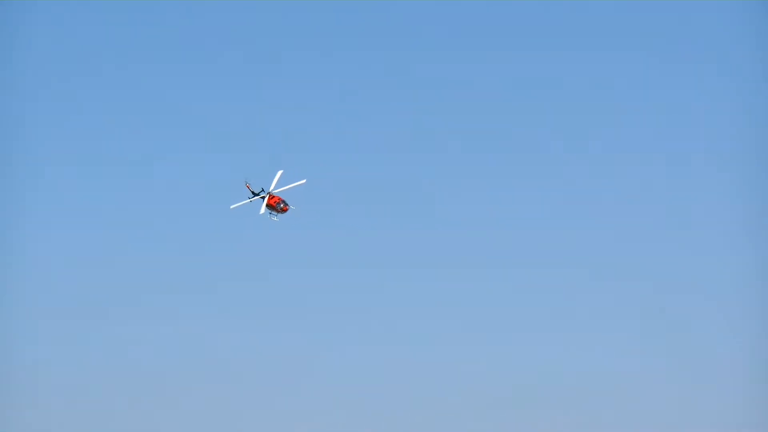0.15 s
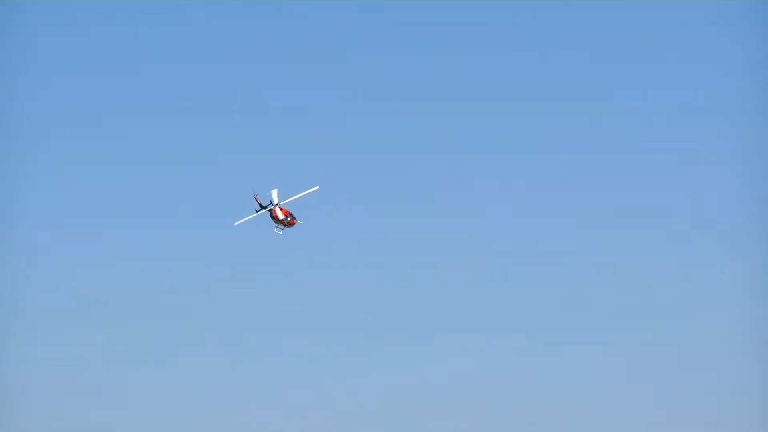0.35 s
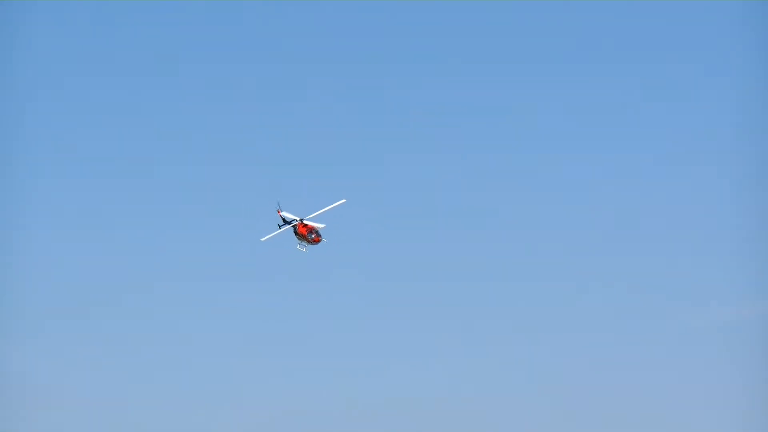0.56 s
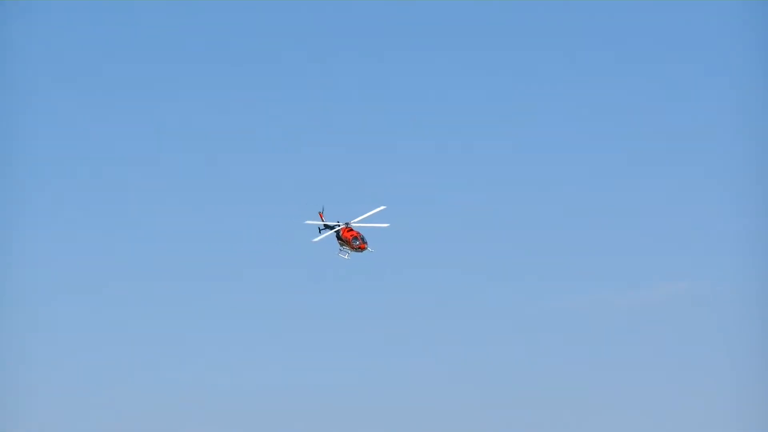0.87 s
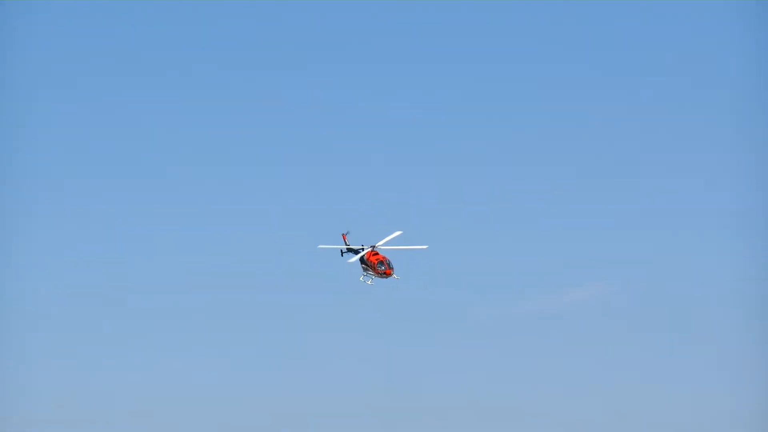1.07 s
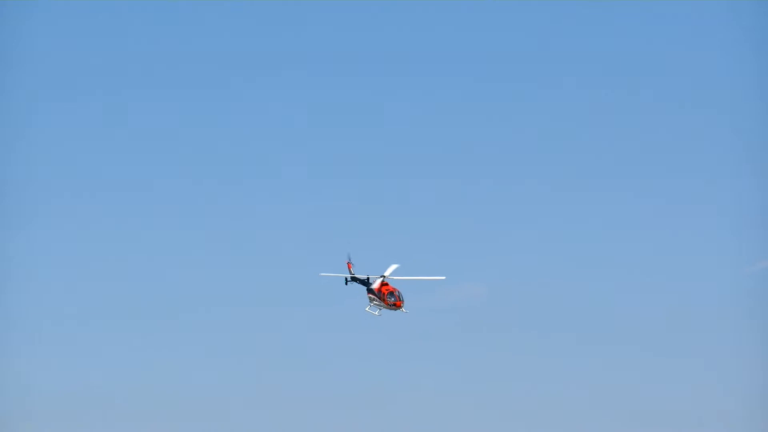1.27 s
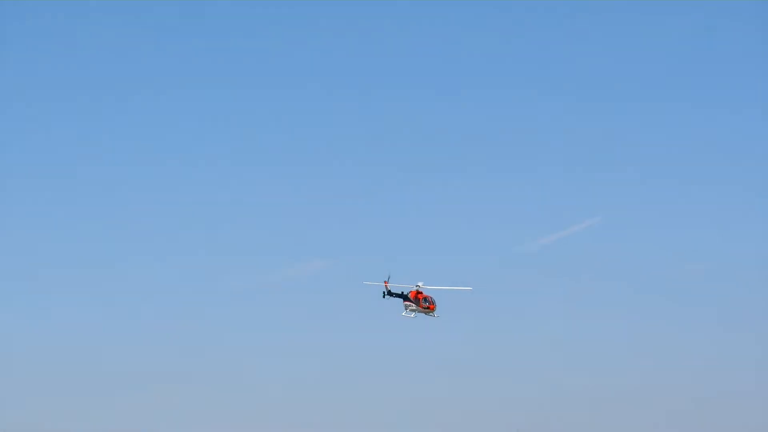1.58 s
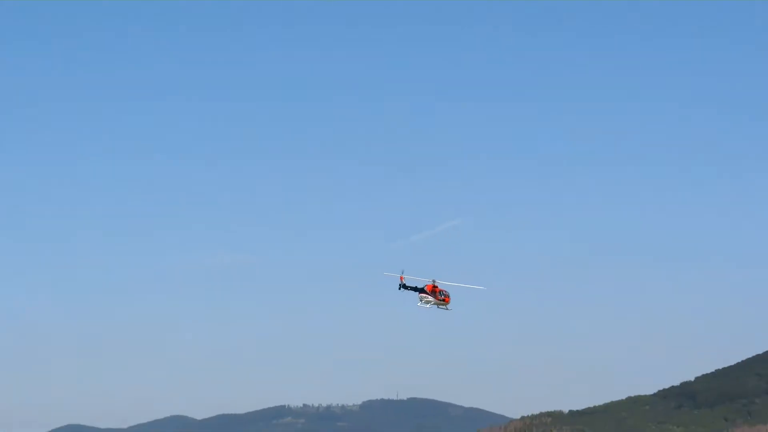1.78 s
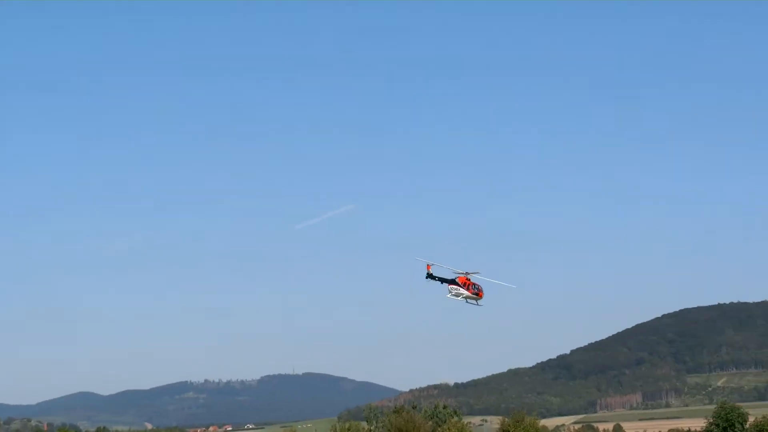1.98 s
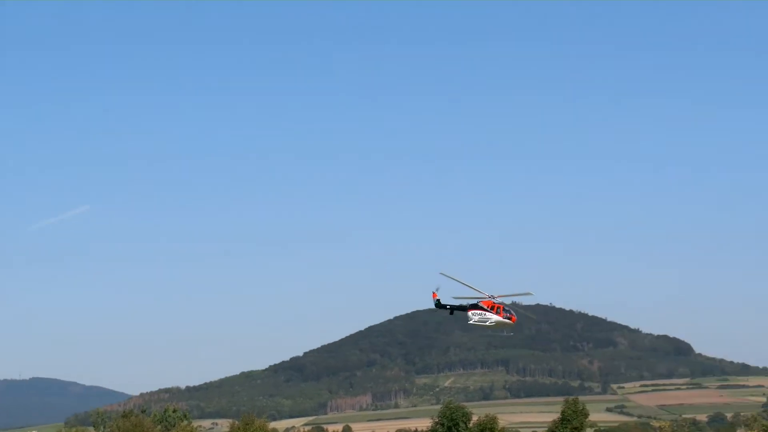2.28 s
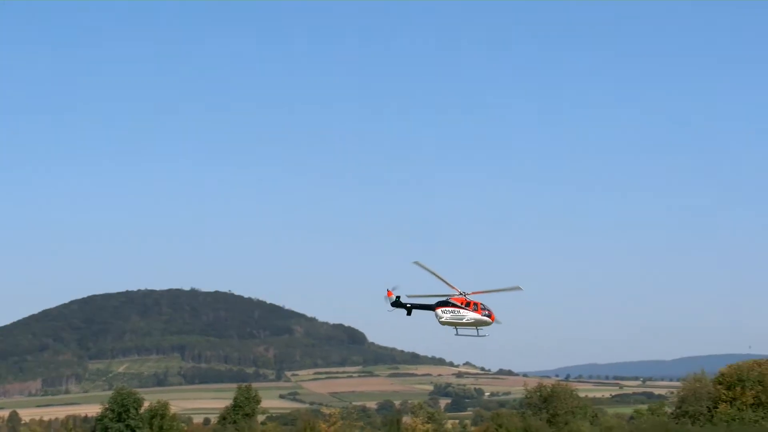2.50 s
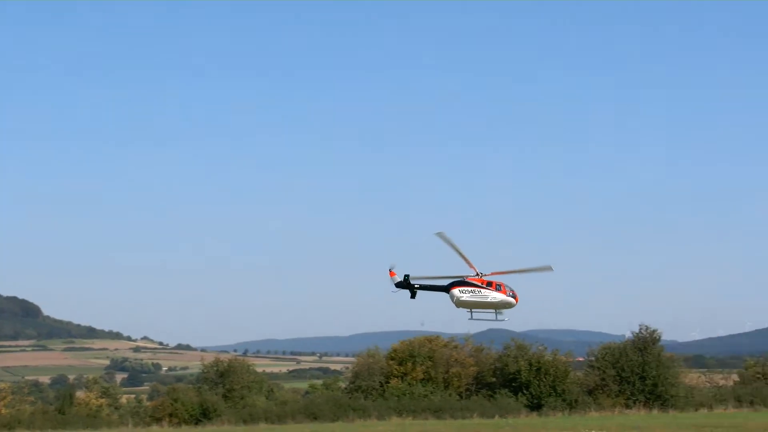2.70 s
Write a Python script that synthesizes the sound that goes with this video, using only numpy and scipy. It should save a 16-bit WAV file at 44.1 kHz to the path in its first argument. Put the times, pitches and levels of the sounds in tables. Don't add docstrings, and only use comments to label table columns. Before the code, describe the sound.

An electric model helicopter whines and chops closer outdoors, its blades hissing, then cracking loudly nearby.

```python
import sys
import numpy as np
from scipy import signal
from scipy.fft import rfft, irfft
from scipy.io import wavfile
from scipy.ndimage import uniform_filter1d, map_coordinates

SR = 44100
rng = np.random.default_rng(int(sys.argv[2]) if len(sys.argv) > 2 else 0)


def gain_from_db(level_db):
    decades = np.asarray(level_db, float) / 20
    return 10 ** decades


def persist_wave(psi):
    counts = np.round(np.clip(psi, -1, 1) * 32767).astype(np.int16)
    wavfile.write(sys.argv[1], SR, np.atleast_2d(counts).T)


N = 125685
GEAR = 7 / 24


def unit(x):
    return x / np.sqrt(np.mean(x ** 2) + 1e-20)


def even_out(noise, window):
    power = uniform_filter1d(np.mean(noise ** 2, axis=0), size=window)
    return noise / np.sqrt(np.abs(power))


def along(points, hz):
    f, v = np.transpose(points)
    return np.interp(np.log(hz + 1), np.log(f + 1), v, left=v[0], right=v[-1])


def curve(rows):
    return np.interp(np.arange(N) / SR, [r[0] for r in rows], [r[-1] for r in rows])


def wobble(rate):
    knots = rng.standard_normal(int(N * 40 / SR) + 4)
    return map_coordinates(knots, [np.arange(N) * min(rate, 40) / SR])


# frequency_hz, likeness (1 = same left and right)
COHERENCE = [(60, 0.77), (180, 0.96), (550, 0.89), (1650, 0.91), (4970, 0.9), (15000, 0.87)]


def shaped(gain_db, patchy_db, size):
    hz, t, z = signal.stft(rng.standard_normal((2, N)), SR, nperseg=size)
    patches = uniform_filter1d(rng.standard_normal(z.shape[1:]), size=8, axis=0)
    patches = uniform_filter1d(patches, size=4, axis=1)
    turn = np.arccos(np.clip(along(COHERENCE, hz), -1, 1))[:, None] / 2
    gain = gain_from_db(gain_db(hz[:, None], t / t[-1]) + patchy_db * unit(patches))
    z = z * gain * [np.cos(turn), np.sin(turn)]
    mid, side = signal.istft(z, nperseg=size)[1][:, :N]
    return np.array([mid + side, mid - side])


def tone(cycles, db, unsteady_db, drift=0.15):
    level = np.sqrt(2) * gain_from_db(db + unsteady_db * wobble(9.07))
    return -level * np.cos(2 * np.pi * (cycles + drift * wobble(6.46)))


# order, level_db, growth (dB per dB nearness), unsteady_db, banking_change_db
TAIL = [(1, -64.5, .55, 1.2, 0), (2, -58, 0, 2.1, 15), (3, -36, 1, .6, 0), (4, -46, .35, 1.2, -2),
        (5, -50.5, .6, 1.5, -1), (6, -63, .7, 2.5, 3), (7, -58, .8, 1.8, -7), (8, -59, -.1, 1.6, 11),
        (9, -62, 1.1, 2, -2), (10, -66, 1.4, 2.2, 1), (11, -70, 1.3, 2, 6), (12, -59, .1, 1.6, 5),
        (14, -66, .5, 2, 0), (15, -63, .5, 2, 0)]


def tail_rotor(turns, near_db):
    bank = np.clip((np.arange(N) / SR - 2.11) / 0.61, 0, 1)
    return sum(tone(order * turns, db + growth * near_db + change * bank, unsteady, drift=order / 100)
               for order, db, growth, unsteady, change in TAIL)


# tail_order, main_blade_passes_added, level_db, growth (dB per dB nearness)
CHOP = [(2, 1, -62, 1.2), (3, 1, -55, 1.4), (4, 1, -56, 1.15), (5, 1, -58, 1.5), (6, 1, -58, 1.75),
        (7, 1, -57.5, 1.75), (8, 1, -63, 1.1), (9, 1, -64, 1.2), (3, 2, -65, 1.6), (6, 2, -62, 1.2),
        (4, 2, -58, .75), (5, 2, -58, .6), (3, .25, -57, 1.05)]


def wake_chop(turns, near_db):
    lag = 0.449
    return sum(tone((order + passes * GEAR) * turns - lag * order, db + growth * near_db, 2.3, drift=0.09)
               for order, passes, db, growth in CHOP)


# start_s, level_db
LOAD = [(0.0, -47), (0.14, -49), (0.2, -56.5), (0.32, -45), (0.42, -50.5), (0.55, -51.5), (0.75, -49.5),
        (0.95, -51.5), (1.15, -49.5), (1.4, -52), (1.6, -45.5), (1.85, -42), (2.0, -41), (2.2, -35),
        (2.33, -34), (2.5, -31), (2.68, -34), (2.85, -29.5)]
# frequency_hz, level_db_per_hz
HISS = [(3000, -15), (5500, -8), (7800, 3), (9200, 1.5), (11000, 2), (12500, 3), (14000, -2), (15000, -15)]
# frequency_hz, sweep_sharpness, then level_db of each of the four blades
SPANS = [
    (7200, 1.1, 0.5, 0.55, -2, -0.5),
    (10050, 1.48, -0.063, -0.62, 1.5, 0.046),
    (13300, 1.7, 0.98, 1.1, -1.5, -0.5),
]
# start_s, lag_blade_passes
SLANT = [(0, .08), (1.2, .04), (1.5, -.15), (2.85, -.17)]


def blade_hiss(passes, size_db):
    def colour(hz, go):
        distance = np.clip((0.55 - go) / 0.15, 0, 1)
        return along(HISS, hz) - 15 * distance * (hz / 14000) ** 4
    spectrum = rfft(even_out(shaped(colour, patchy_db=2, size=256), SR // 5))
    hz, out = np.fft.rfftfreq(N, 1 / SR), 0
    centres_hz = [r[0] for r in SPANS]
    for i, (_, sharp, *blades_db) in enumerate(SPANS):
        part = irfft(spectrum * np.interp(hz, centres_hz, np.arange(3) == i), N)
        heard = passes - (i - 1) * curve(SLANT)
        index = np.round(heard).astype(int)
        draws = rng.standard_normal((400, 2))
        angle = 2 * np.pi * (heard - index + 0.019 * draws[index, 0])
        sweep = unit(np.exp(sharp * (np.cos(angle) - 1) / 2))
        pass_db = size_db + np.resize(blades_db, 400) + 1.3 * draws[:, 1]
        out = out + gain_from_db(uniform_filter1d(pass_db[index], size=90)) * sweep * part
    return gain_from_db(curve(LOAD) - 1) * out


# start_s, peak_db
CRACKS = [(1.3464, -31), (1.5508, -20), (1.7848, -23), (1.9868, -23), (2.019, -19), (2.0492, -21),
          (2.2367, -22), (2.301, -21), (2.3792, -17), (2.586, -17), (2.6044, -15), (2.6508, -18),
          (2.764, -12), (2.7969, -15)]


def blade_slap(blades, near_db):
    draws = rng.standard_normal((400, 2))
    at = np.flatnonzero(np.diff(np.floor(blades)))
    late = (draws[:len(at), 0] * 40).astype(int)
    kicks, cracks = np.zeros(N), np.zeros(N)
    cracks[[round(s * SR) + 20 for s, _ in CRACKS]] = [gain_from_db(db - 4) for _, db in CRACKS]
    kicks[np.clip(at + late, 0, N - 1)] = gain_from_db(2 * draws[:len(at), 1])
    u = np.pi * 1500 * np.arange(-64, 65) / SR
    pulse = (2 * u ** 2 - 1) * np.exp(-u ** 2)
    return np.convolve(gain_from_db(-37 + 1.4 * near_db) * kicks + cracks, pulse, "same")


def blade_whistle(blades, size_db):
    into = blades % 4 - 0.98
    hz = 5650 + 4250 * np.clip(into, 0, 1.3)
    strength_db = 1.3 * size_db[4 * (blades // 4).astype(int) + 2]
    shape = np.exp(-((into - 0.65) / 0.22) ** 2) * (np.arange(N) / SR < 1.36)
    breath = 1 + 0.61 * unit(uniform_filter1d(rng.standard_normal(N), size=40))
    level = gain_from_db(curve(LOAD) + 1 + strength_db)
    return level * shape * breath * np.sin(2 * np.pi * np.cumsum(hz) / SR)


# order, level_db, growth (dB per dB nearness), unsteady_db
MOTOR = [(1.537, -67, .1, 1.2), (2.5, -61, .15, 2.1), (4.5, -64, .2, 2.1), (12.5, -66, .1, 1.5),
         (24.01, -66, .1, 1.2), (24.52, -65, .4, 1.2)]


def motor(turns, near_db):
    return sum(tone(order * turns + rng.random(), db + growth * near_db, unsteady, drift=0.089)
               for order, db, growth, unsteady in MOTOR)


# order, centre_s, width_s, level_db
GLINTS = [
    (2.5, .85, .25, -59),
    (12.5, 1.05, .5, -58),
    (12, 1.12, .12, -58),
    (36.93, 1.75, .45, -56),
    (36.93, .9, .4, -64),
    (8, .1, .25, -59),
    (24.01, .6, .8, -66),
    (36.95, 1.47, .05, -55),
    (36.83, 1.85, .3, -61),
    (37.06, 2.7, .2, -53),
]


def drive_glints(turns):
    t = np.arange(N) / SR
    return sum(np.exp(-((t - s) / width) ** 2) * tone(order * turns, db, 0.96, drift=0.29)
               for order, s, width, db in GLINTS)


def gust_puff():
    t = np.arange(N) / SR
    return gain_from_db(-41) * np.exp(-((t - 0.299) / 0.004) ** 2) * np.sin(2 * np.pi * 680 * t)


# frequency_hz, level_db_per_hz
FAR_AIR = [(53, -73), (90, -38.5), (667, -16.5), (793, -17.5), (883, -19.5), (2230, -25.5), (10100, -34.5),
           (12800, -52), (15500, -80)]
# frequency_hz, level_db_per_hz
NEAR_AIR = [(53, -99), (90, -44), (170, -56.5), (586, -8), (639, -10.5), (793, -14), (3660, -11.5),
            (12500, -31), (15500, -70)]
# start_hz, end_hz, width_hz, depth_db (negative = peak)
NOTCHES = [(778, 852, 38, 17.5), (1250, 2110, 54, 19), (2740, 3080, 186, -3.5), (2070, 2540, 59, 5.5),
           (2750, 3570, 114, 7), (3290, 3910, 240, -0.5), (3690, 3710, 200, 7), (4210, 4280, 170, 5),
           (4640, 4540, 76, 4.5), (5100, 5040, 130, 5), (5450, 4900, 100, -4), (1230, 1800, 290, -1),
           (6660, 6860, 430, 7)]


def air(near_db):
    def colour(hz, go):
        flat = (1 - go) * along(FAR_AIR, hz) + go * along(NEAR_AIR, hz)
        return flat - sum(db * np.exp(-((hz - a - (b - a) * go) / w) ** 2) for a, b, w, db in NOTCHES)
    noise = even_out(shaped(colour, patchy_db=1.37, size=1024), SR // 3)
    return gain_from_db(-40 + 0.71 * near_db + 0.62 * wobble(6.3)) * noise


# start_s, pitch_hz
SPEED = [(0.0, 221.64), (0.15, 222.43), (0.4, 223.61), (0.7, 223.32), (1.0, 222.81), (1.3, 221.94),
         (1.55, 220.34), (1.8, 220.06), (2.05, 220.81), (2.25, 219.26), (2.45, 217.01), (2.65, 214.43),
         (2.85, 211.41)]
# start_s, level_db
NEAR = [(0, -43.5), (0.15, -44.5), (0.35, -47), (0.6, -46), (0.9, -43), (1.2, -40), (1.5, -37),
        (1.8, -34.5), (2.1, -31), (2.3, -29.5), (2.5, -27.5), (2.7, -27), (2.85, -26)]
# start_s, offset_blade_passes
HEADING = [(0, -.12), (.25, -.11), (.6, .05), (.9, .03), (1.25, .17), (1.5, -.28), (2, -.21), (2.6, -.52),
           (2.85, -.55)]
BLADES_DB = [-0.5, 0.79, 1.3, 0.22]
# start_s, level_db
SWISHES = [(0.172, -12), (0.279, 4.5), (0.355, -2), (0.462, 6), (0.54, -5), (0.706, 4.5), (0.785, -4),
           (0.846, -2), (0.938, 6.5), (0.951, 7), (1.031, -11), (1.075, 4.5), (1.091, -8), (1.196, 3.5),
           (1.258, 8), (1.322, 5), (1.403, -14), (1.653, -12), (1.716, -14), (1.824, 2.5), (2.089, -6),
           (2.152, -5), (2.247, 3.5), (2.261, 2), (2.34, -5), (2.358, -4), (2.388, 4.5), (2.707, 5),
           (2.772, 3.5), (2.848, 0)]


def scene():
    turns = np.cumsum(curve(SPEED)) / SR
    blades = GEAR * turns
    near_db = curve(NEAR) + 36
    passes = blades + curve(HEADING)
    size_db = np.resize(BLADES_DB, 400) + 0.7 * rng.standard_normal(400)
    gusty = [round(passes[min(int(s * SR), N - 1)]) for s, _ in SWISHES]
    size_db[gusty] = [db for _, db in SWISHES]
    point = tail_rotor(turns, near_db) + wake_chop(turns, near_db)
    point = point + motor(turns, near_db) + drive_glints(turns) + gust_puff()
    point = point + blade_whistle(blades, size_db) + blade_slap(blades, near_db)
    balance = gain_from_db([[-0.15], [0.15]])
    return (point + air(near_db) + blade_hiss(passes, size_db)) * balance


def low_pass(x):
    return signal.sosfilt(signal.butter(12, 15750, fs=SR, output="sos"), x)


def record(dry):
    hz, _, z = signal.stft(dry, SR, nperseg=1024)
    treble = np.mean(np.abs(z[:, (hz > 9000) & (hz < 13000)]) ** 2, axis=(0, 1))
    treble_db = 10 * np.log10(uniform_filter1d(treble, size=3) + 1e-20)
    edge_hz = 14450 + 62 * (treble_db - treble_db.mean())
    low_cut = 1 / (1 + (140 / (hz[:, None] + 1)) ** 4)
    kept = signal.istft(z * (hz[:, None] < edge_hz) * low_cut, SR, nperseg=1024)[1][:, :N]
    return low_pass(kept)


dry = scene()
out = record(dry)
persist_wave(out)
```